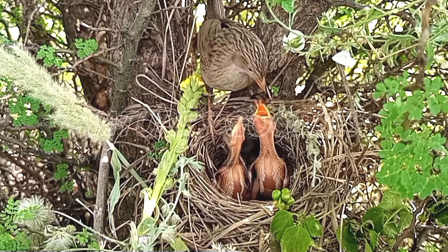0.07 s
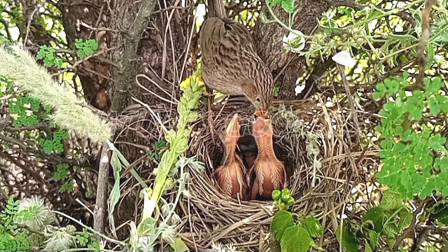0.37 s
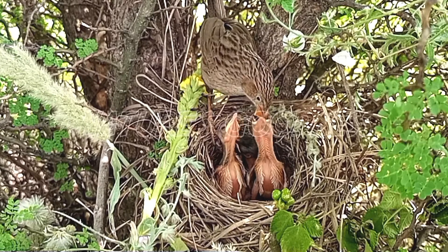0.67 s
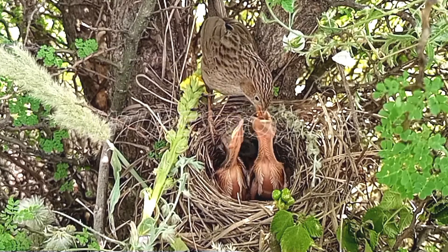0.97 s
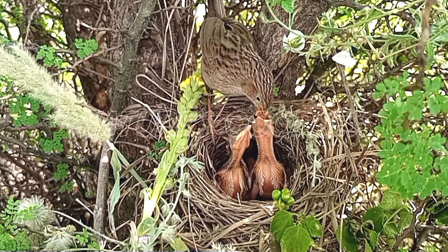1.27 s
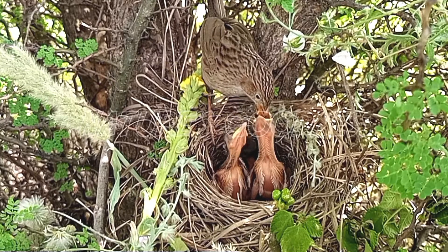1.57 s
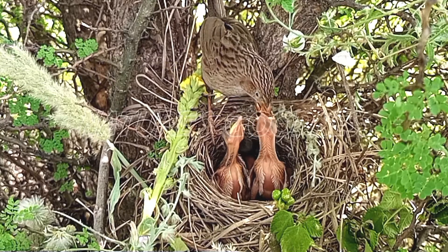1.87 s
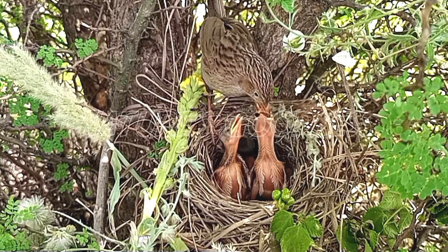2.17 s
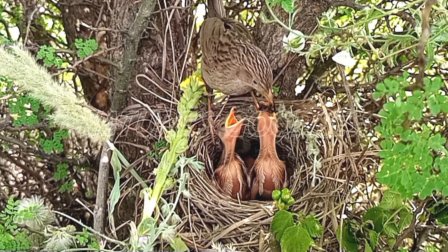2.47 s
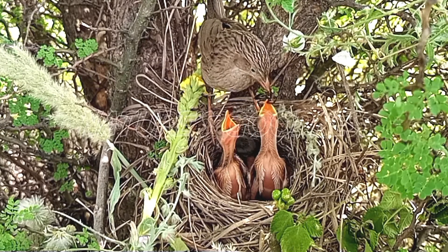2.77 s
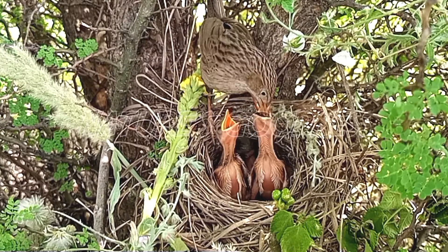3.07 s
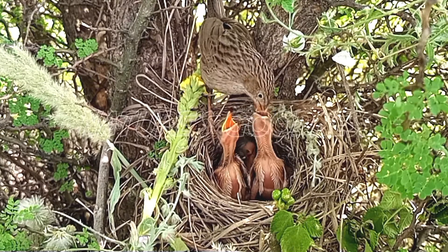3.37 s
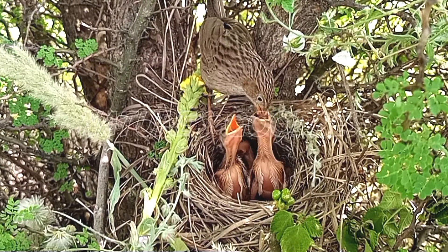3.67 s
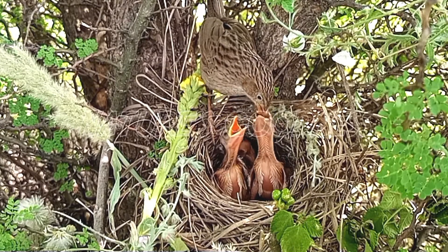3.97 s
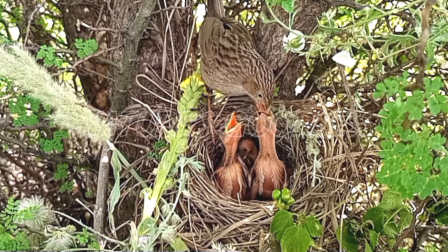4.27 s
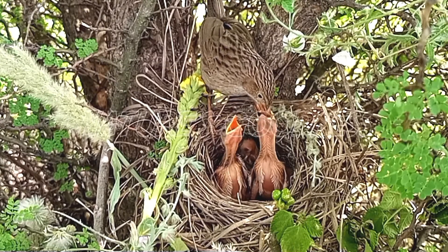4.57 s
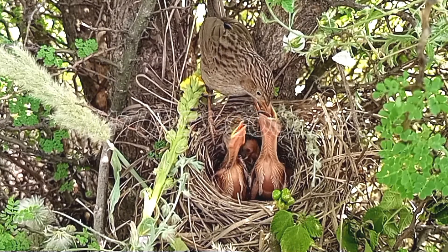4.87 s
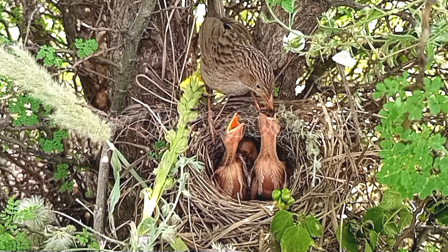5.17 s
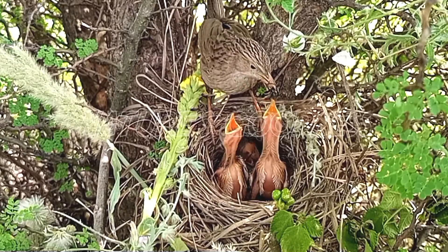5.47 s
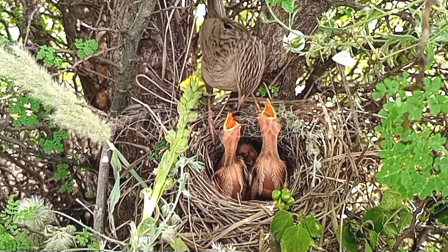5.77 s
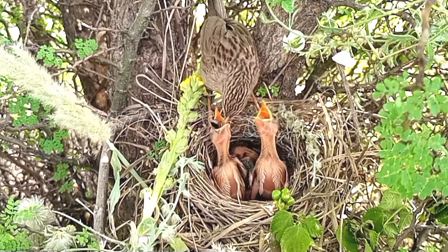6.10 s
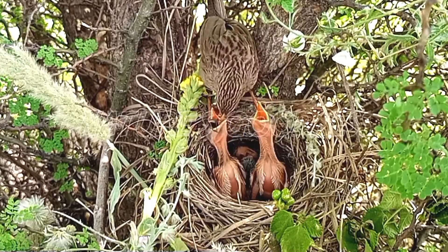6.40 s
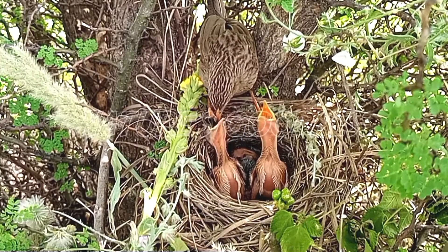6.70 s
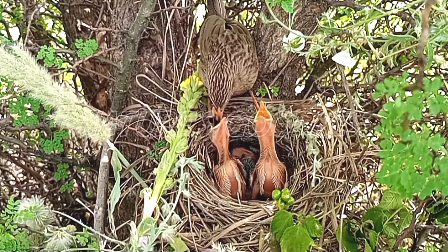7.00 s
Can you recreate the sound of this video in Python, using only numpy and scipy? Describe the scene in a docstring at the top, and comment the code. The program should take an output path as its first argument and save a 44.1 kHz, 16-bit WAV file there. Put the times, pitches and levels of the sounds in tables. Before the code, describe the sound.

Nestlings beg close by in a bush for the whole seven seconds. Their thin, very high squeals last about a tenth to a third of a second each and often carry two pitches at once, some held, some sliding down, some fluttering and raspy. Short, lower chirps and a few soft scratchy twitters fall between them. From about 1.1 to 2.5 seconds, five bird whistles cut in, roughly three a second, each rising quickly and falling more slowly; these are the loudest sounds. The squealing continues, with tiny beak or twig ticks at 4.6 and 5.2 seconds and faint peeps from 5.7 to 7. A distant bird trills faintly, about ten chips a second, during the first 0.7 seconds and again from 4.3 to the end. The foliage adds only slight, short reflections. A soft, even outdoor hiss and low rumble lie underneath throughout.

```python
"""Nestlings begging in a bush

Each side of the syrinx is an independent oscillator, so a squeal has two voices, which flutter and
rasp when forced. Five loud arched whistles cut in, among chirps, twitters, faint peeps and ticks of
beak and twigs. Twigs and ground scatter the calls; a far bird trills over hiss and a low rumble."""
import sys
import numpy as np
from scipy import signal
from scipy.fft import rfft, irfft
from scipy.io import wavfile
from scipy.ndimage import map_coordinates

SR = 44100
rng = np.random.default_rng(int(sys.argv[2]) if len(sys.argv) > 2 else 0)


def transcribe(signal):
    """Save signal, clipped to [-1, 1], as a 16-bit WAV file at the path in sys.argv[1]."""
    frames = np.atleast_2d(signal).T
    limited = np.clip(frames, -1, 1)
    pcm = np.round(limited * 32767).astype(np.int16)
    wavfile.write(sys.argv[1], SR, pcm)


N = 310464
T = np.arange(N) / SR

# Held squeals; "loudest" places the peak of the swell within a note: (start [s], end [s],
# upper voice: pitch [Hz], glide [Hz], scoop [Hz], flick [Hz], level [dB], loudest [0-1],
# lower voice: pitch [Hz], glide [Hz], bow [Hz], level [dB], loudest [0-1])
HELD_SQUEALS = [(0.0, 0.109, 6170, 356, -68, -70, -26.5, 0.67, 3930, -350, 64, -38, 0),
                (0.262, 0.38, 6310, 2132, 2260, -500, -25.5, 0.73, 3990, -1820, -340, -36, 0.96),
                (0.606, 0.768, 5355, 653, 1426, -1100, -34, 0.76, 4450, 500, 247, -42, 0.53),
                (0.99, 1.234, 5607, -300, 541, -140, -24.5, 0.2, 4680, 500, 197, -36.5, 0.53),
                (1.471, 1.679, 5540, -200, 420, -26, -25.5, 0.77, 4530, 600, -5, -36, 0.15),
                (1.949, 2.187, 5433, -440, 592, -10, -29, 0.26, 4450, 500, 200, -40, 0.7),
                (2.541, 2.753, 5720, -1040, 137, 600, -29, 0.1, 4550, 106, 450.5, -44, 0.63),
                (2.901, 3.134, 5780, -410, 1050, 1028, -26.5, 1, 4270, -90, 152, -40.5, 0.73),
                (3.867, 4.067, 5450, 260, 842, -420, -27, 0.12, 4440, 629, -150, -41, 0.76),
                (4.318, 4.513, 5625, -540, 404, 202, -24, 0.35, 4430, -100, 163, -40, 0.09),
                (4.747, 4.977, 5600, -190, 641, 6, -23.5, 0.66, 4550, 340, 483, -41, 0.95),
                (5.215, 5.413, 5630, -700, 364, 232, -28.5, 0.35, 4400, -250, 424.5, -38.5, 0.1),
                (5.724, 5.994, 5770, 547, 468, 960, -28, 0.81, 4194, -920, 850, -40.5, 0.5),
                (6.241, 6.431, 5886, 1016, 1727, -800, -26.5, 0.81, 3724, -1150, 202, -37.5, 0.73),
                (6.577, 6.759, 5700, -140, 658, 770, -24.5, 0.42, 5100, -1270, 600, -36, 0.72),
                (6.758, 6.987, 5620, -160, 660, 1300, -32, 0.88, 4150, -540, 502, -37.5, 1)]
# Squeals whose lower voice slides far down: (start [s], end [s], climb [s],
# then for the upper and the lower voice: crest [Hz], final pitch [Hz], level [dB], loudest [0-1])
FALLING_SQUEALS = [(0.389, 0.568, 0.054, 5850, 5300, -48, 0.65, 5130, 4470, -42, 0.66),
                   (0.851, 1, 0.024, 5090, 5600, -54, 0.94, 3920, 3190, -33.5, 0.26),
                   (2.616, 2.939, 0.033, 5820, 6430, -36, 0.45, 5000, 3580, -40.5, 0.39),
                   (3.206, 3.523, 0.025, 6700, 6380, -32, 0.56, 5670, 2905, -35, 0.37),
                   (3.819, 4.134, 0.04, 6120, 6150, -33, 0.9, 6060, 3800, -32, 0.73),
                   (4.414, 4.659, 0.03, 6360, 6190, -33.5, 0.62, 5690, 3780, -31.5, 0.57),
                   (5.052, 5.34, 0.081, 6130, 5660, -35, 0.9, 5390, 3817, -35.5, 0.42),
                   (5.59, 5.729, 0.034, 6820, 7130, -33.5, 0.62, 5200, 4050, -33.5, 0.52),
                   (6.013, 6.297, 0.019, 7300, 7200, -59, 0.3, 5580, 3253, -28, 0.88)]
# One-voiced chirps: (start [s], end [s], pitch [Hz], glide [Hz], bow [Hz], level [dB], loudest [0-1])
CHIRPS = [(0.0, 0.145, 4250, -440, -270, -43.5, 0.87), (0.199, 0.265, 2450, -130, 0, -37, 0.2),
          (0.351, 0.392, 3530, -300, 4, -28.5, 0.2), (0.356, 0.391, 2176, -700, 0, -20, 0.26),
          (0.897, 1.032, 4300, -70, 2, -39.5, 0.73), (1.418, 1.455, 5000, 440, 260, -47, 0.78),
          (1.669, 1.766, 4670, -1750, -29, -42, 0), (1.804, 1.842, 2570, -120, -50, -27, 0.15),
          (2.098, 2.194, 1660, 0, -120, -46.5, 0.56), (2.248, 2.335, 4450, -610, -400, -29.5, 0.42),
          (2.273, 2.321, 7070, 200, -180, -38, 0.58), (2.345, 2.387, 5630, -190, 160, -34, 0.67),
          (2.35, 2.389, 2820, -370, 40, -24.5, 0.12), (2.806, 2.95, 5770, 0, 2, -47, 0.8),
          (2.876, 2.945, 3290, -170, -40, -28.5, 0.1), (3.27, 3.402, 4370, -1620, -350, -37.5, 0.04),
          (3.317, 3.44, 6460, -120, -5, -20.5, 0.2), (3.385, 3.53, 3158, -260, 0, -25.5, 0.16),
          (3.431, 3.5, 1716, 20, 418, -37, 0.5), (3.514, 3.676, 2500, 800, 320, -30.5, 0.28),
          (3.621, 3.714, 3610, 93, 44, -40.5, 0.65), (3.731, 3.854, 2172, -660, -35, -35, 0.5),
          (3.746, 3.945, 4440, -46, -170, -45, 0.75), (3.825, 3.9, 5480, 650, 100, -48, 0.8),
          (4.295, 4.335, 6425, -250, 28, -34, 0.7), (4.857, 4.975, 4130, 70, 165, -46, 0.7),
          (5.719, 5.757, 2475, -320, -67, -29, 0.76), (5.936, 6.001, 3203, 645, -38, -25.5, 0.3),
          (5.975, 6.009, 1900, 650, -20, -30, 0.9), (6.029, 6.083, 6910, 1000, 160, -29.5, 0.76),
          (6.376, 6.43, 2860, -150, 3, -24.5, 0.35), (6.434, 6.453, 2030, 40, 100, -32, 0.6),
          (6.535, 6.592, 5740, -100, 463, -28.5, 0.2), (6.957, 7.045, 6010, -610, 288, -33, 0.62),
          (6.987, 7.005, 1966, -17, -20, -25.5, 0.5)]
# Forced stretches: (start [s], end [s], upper voice's swing [Hz], flutter rate [Hz], throb [dB])
FLUTTERS = [(0, 0.105, 80, 98.4, 0.5), (0.185, 0.316, 50, 112.7, 1.5), (.36, 0.406, 93, 137, 2.5),
            (1.796, 1.831, 163, 64.5, 0.5), (3.385, 3.534, 75, 194.3, 2), (3.53, 3.86, 39.7, 159, 2.5),
            (5.887, 6.02, 90, 125.6, 2.2), (6.36, 6.427, 89.5, 135, 1.8), (6.715, 6.75, 70, 138, 1),
            (6.89, 7.003, 65, 124.8, 1.5)]
# Wide gapes that let out the lower voice's octave: (start [s], end [s], octave gain [dB])
GAPES = [(0, .1, -11.5), (2.594, 2.746, -2.5), (2.96, 3.135, -9), (5.29, 5.413, -9.5), (5.73, 5.946, -4.5),
         (6.283, 6.36, -3.5), (6.61, 6.678, -1.5), (6.782, 6.961, -3)]
# Slight change in loudness of squeals and chirps with pitch: (pitch [Hz], gain [dB])
SQUEAL_COLOUR = [(2000, -0.15), (3000, -1.05), (3900, 1), (4600, 2.5), (5100, 2.5), (5700, 1.07),
                 (6500, 1.4), (7200, -0.9)]
# Whistles: (start [s], length [s], top pitch [Hz], last pitch [Hz], level [dB], effort change [dB])
WHISTLES = [(1.135, 0.19, 5520, 3330, -16.5, 5.5), (1.448, 0.19, 5380, 3323, -13, -5),
            (1.75, 0.18, 5220, 3290, -14.5, 0.5), (2.057, .19, 5350, 3264, -13, -3),
            (2.362, 0.17, 4853, 3295, -13.5, 2.5)]
# Their shared pitch contour: (share of length [0-1], height from last to top pitch [0-1])
WHISTLE_ARCH = [(0, .48), (.055, 0.048), (.135, .44), (.25, .87), (.31, 1), (.37, 1), (.43, .87),
                (.65, .54), (.85, 0.27), (1, 0.0064)]
# Resonances that the whistles sweep through: (frequency [Hz], gain [dB])
WHISTLE_RESONANCES = [(3300, -10.5), (3500, -8.5), (3850, -0.5), (4050, -4.5), (4250, 0.5), (4420, -3),
                      (4750, -10), (5200, -14.5), (5500, -9.5)]
# Soft twitters: (start [s], end [s], pitch [Hz], glide [Hz], bow [Hz], level [dB], loudest [0-1])
TWITTERS = [(0.187, 0.25, 3880, -500, -200, -39, 0.47), (0.239, 0.289, 3594, -1000, 457, -30, 0),
            (1.945, 1.983, 3410, -750, 0, -35.5, 0), (3.89, 3.944, 3470, -600, 0, -43, .5)]
# Ticks of beak and twigs: (time [s], level [dB], pitch [Hz])
TICKS = [(4.593, -25, 10640), (5.203, -36, 10700), (5.213, -37, 9900)]
# Bouts of the far trill: (start [s], end [s], chip spacing [s])
TRILL_BOUTS = [(.048, .72, .0885), (4.345, 4.72, .081), (4.785, 7.02, .1011)]
# Course of the trill: (time [s], top pitch [Hz], level [dB])
TRILL_COURSE = [(.05, 2830, -49), (.3, 2870, -63), (.57, 2670, -51.5), (.68, 2720, -61),
                (4.34, 3105, -53.5), (4.7, 2948, -45.5), (5.4, 3025, -54.5), (5.9, 3023, -49.5),
                (6.5, 2986, -48), (6.8, 2690, -45.5)]
# One chip: (time from onset [s], drop below top if slurred [Hz], drop if arched [Hz], level [dB])
CHIP_SHAPE = [(0, 5, 713, 2.5), (.009, 32, 258, -0.5), (0.021, 110, 3, 0.5), (.033, 157, 145, -4),
              (0.046, 230, 640, -2.5)]
# Change of the chips from slurs to arches: (time [s], arch [0-1])
CHIP_ARCHING = [(4.85, 0), (5.35, 1)]
# Spectrum of the outdoor background: (frequency [Hz], relative spectral level [dB])
AIR_SPECTRUM = [(25, -9), (50, -0.5), (98, 5.5), (346, -4), (494, -5.5), (627, -7), (1220, -11.5),
                (1750, -11.5), (2170, -13.5), (3030, -11.5), (4770, -14.5), (15000, -18.5)]

WAVER_HZ, SWAY_HZ, SWAY_DB = 32, 48, 1.2  # unsteady effort: quick and slow pitch drift, level drift
RASP_HZ = 75  # random pitch spread of the upper voice when fully forced
SCOOP_S, FLICK_S = .035, .025
LEAD_S, LEAD_DB = .018, -9.5  # a falling squeal creeps in early and softly
ONSET_SHARE, SLIDE_EASE = .89, 1.9  # first pitch as a share of the crest; slowing of the slide
CATCH_SPACING_HZ, CATCH_STRENGTH = 520, .55  # a sliding voice lingers on evenly spaced pitches
SWELL_DB, FADE_DB, EDGE_DB, EDGE_S = 10, 9, 7.5, 0.0062
WHISTLE_ATTACK_S, WHISTLE_ATTACK_DB = 0.026, -15
PEEP_COUNT, PEEP_SPAN_S, PEEP_RANGE_HZ = 11, (5.68, 6.92), (2900, 5300)
PEEP_S, PEEP_GLIDE_HZ, PEEP_BOW_HZ, PEEP_DB = 0.078, 600, 246, -51
AIR_DB, CUTOFF_HZ = -46.5, 15500


def nestlings():
    """Two oscillators on one air stream share their modulation and mix nonlinearly into a sum tone."""
    bend = WAVER_HZ * wander(75)
    throb_db = SWAY_DB * wander(45)
    bend += SWAY_HZ * wander(36)
    phase_drift = 1.3 * wander(50)  # the flutter is not quite regular
    rasp = RASP_HZ * wander(480)  # a forced membrane also slips at random
    for start, end, swing, rate, depth_db in FLUTTERS:
        forced = gate(start, end)
        cycle = np.sin(2 * np.pi * rate * (T - start) + phase_drift)
        bend += forced * (swing * cycle + min(depth_db / 2, 1) * rasp)
        throb_db += forced * depth_db * cycle
    upper, lower = squeal_notes()
    high, high_octave = voice(upper, jitter_hz=28.6, jitter_rate=240, shimmer_db=1.52, bend_hz=bend)
    low, low_octave = voice(lower, jitter_hz=26.7, jitter_rate=240, shimmer_db=2.5, bend_hz=.618 * bend)
    gape = undb(-27.5) + sum(gate(start, end, edge_s=0.0073) * undb(db) for start, end, db in GAPES)
    octaves = gape * band(low_octave, 5500, 9160) + undb(-38.5) * high_octave
    sum_tone = undb(15) * band(high * low, 6200, 8800)
    return (undb(0.5) * high + low + octaves + sum_tone) * undb(throb_db)


def squeal_notes():
    """Biphonation: each side of the syrinx has its own notes; chirps use the lower voice alone."""
    upper, lower = [], [bowed(*row) for row in CHIRPS]
    for start, end, *voices in HELD_SQUEALS:
        upper.append(held(start, end, *voices[:6]))
        lower.append(bowed(start, end, *voices[6:]))
    for start, end, climb, *voices in FALLING_SQUEALS:
        upper.append(falling(start, end, climb, *voices[:4]))
        lower.append(falling(start, end, climb, *voices[4:]))
    return upper, lower


def held(start, end, hz, glide, scoop, flick, db, loudest):
    """A linear glide between two pitch transients: a scoop at the onset and a flick at the release."""
    s, share = clock(start, end)
    onset = scoop * np.exp(-(s / SCOOP_S) ** 2)
    release = flick * np.exp((s - s[-1]) / FLICK_S)
    return sung(start, end, hz + glide * (share - .5) + onset + release, db, loudest)


def falling(start, end, climb, crest, final, db, loudest):
    """Exponential relaxation: the frequency climbs to a crest, then slows towards its final value."""
    s, _ = clock(start - LEAD_S, end)
    crest_s = LEAD_S + climb
    early = np.clip(1 - s / crest_s, 0, 1) ** 2
    past_crest = np.clip((s - crest_s) / (s[-1] - crest_s), 0, 1)
    slide = np.expm1(-SLIDE_EASE * past_crest) / np.expm1(-SLIDE_EASE)
    pitch = crest * (1 - (1 - ONSET_SHARE) * early) + (final - crest) * slide
    return sung(start - LEAD_S, end, pitch, db + LEAD_DB * early, loudest)


def bowed(start, end, hz, glide, bow, db, loudest):
    """A parabolic frequency sweep: a glide that bulges in the middle."""
    _, share = clock(start, end)
    pitch = hz + glide * (share - .5) - bow * (2 * share - 1) ** 2
    return sung(start, end, pitch, db, loudest)


def sung(start, end, hz, db, loudest):
    """Envelope: a note swells and fades as it slides in soft steps; loudness varies a little with pitch."""
    s, share = clock(start, end)
    catch_phase = 2 * np.pi * hz / CATCH_SPACING_HZ + rng.uniform(0, 2 * np.pi)
    pitch = hz - CATCH_STRENGTH * CATCH_SPACING_HZ / (2 * np.pi) * np.sin(catch_phase)
    swell = np.interp(share, [0, np.clip(loudest, .02, .98), 1], [-SWELL_DB, 0, -FADE_DB])
    edges = EDGE_DB * (np.exp(-s / EDGE_S) + np.exp((s - s[-1]) / EDGE_S))
    return np.column_stack([start + s, pitch, db + swell - edges + lookup(pitch, SQUEAL_COLOUR)])


def voice(notes, jitter_hz, jitter_rate, shimmer_db, bend_hz=0, edge_s=.0018):
    """A vibrating membrane's fundamental and octave; note rows are (time [s], pitch [Hz], level [dB])."""
    tone, octave = np.zeros((2, N))
    bend = np.broadcast_to(bend_hz, N)
    for rows in notes:
        s, hz, db = np.transpose(rows)
        span = np.arange(max(0, int((s[0] - edge_s) * SR)), min(N, int((s[-1] + edge_s) * SR)))
        t = T[span]
        pitch = np.interp(t, s, hz) + bend[span] + jitter_hz * wander(jitter_rate, len(t))
        level = np.interp(t, s, db) + shimmer_db * wander(110.2, len(t))
        ramp = np.clip(np.minimum(t - t[0], t[-1] - t) / (2 * edge_s), 0, 1)
        amplitude = np.sqrt(2) * np.sin(np.pi / 2 * ramp) ** 2 * undb(level)
        phase = 2 * np.pi * np.cumsum(pitch) / SR
        tone[span] += amplitude * np.sin(phase)
        octave[span] += amplitude * np.sin(2 * phase)
    return tone, octave


def whistles():
    """Resonance: a nearly pure tone dips, rises quickly and falls slowly, loudest near 4 kHz."""
    notes = []
    for start, length, top, last, db, change_db in WHISTLES:
        s, share = clock(start, start + length)
        hz = last + (top - last) * lookup(share, WHISTLE_ARCH)
        attack = WHISTLE_ATTACK_DB * np.clip(1 - s / WHISTLE_ATTACK_S, 0, 1)
        level = db + attack + change_db * (share - .5) + lookup(hz, WHISTLE_RESONANCES)
        notes.append(np.column_stack([start + s, hz, level]))
    tone, octave = voice(notes, jitter_hz=30.8, jitter_rate=300, shimmer_db=2.0)
    return tone + undb(-22.5) * band(octave, 9810, 10470)


def twitters():
    """Strong random modulation of frequency and amplitude makes quiet slurs scratchy."""
    return voice([bowed(*row) for row in TWITTERS], jitter_hz=179, jitter_rate=410, shimmer_db=6.5)[0]


def peeps():
    """Faint arched frequency sweeps from deep in the nest, random in time, pitch and slope."""
    notes = []
    for when, height, slope in rng.uniform(size=(PEEP_COUNT, 3)):
        start = np.interp(when, [0, 1], PEEP_SPAN_S)
        hz = np.interp(height, [0, 1], PEEP_RANGE_HZ)
        glide = PEEP_GLIDE_HZ * (2 * slope - 1)
        notes.append(bowed(start, start + PEEP_S, hz, glide, PEEP_BOW_HZ, PEEP_DB, loudest=.5))
    return voice(notes, jitter_hz=49.6, jitter_rate=240, shimmer_db=3.5)[0]


def ticks(decay_s=0.0036):
    """Damped transients of beak and twigs: noise bursts, each strongest near its own pitch."""
    out = np.zeros(N)
    for start, db, hz in TICKS:
        envelope = undb(db) * (T >= start) * np.exp(-np.abs(T - start) / decay_s)
        snap = envelope * rng.standard_normal(N)
        out += undb(12) * band(snap, 0.92 * hz, 1.024 * hz) + undb(-6) * band(snap, 4000, 16000)
    return out


def far_trill():
    """A periodic train of sweeps: about ten chips a second, changing from falling slurs to arches."""
    times, pitches, levels = np.transpose(TRILL_COURSE)
    offset, slur_drop, arch_drop, chip_db = np.transpose(CHIP_SHAPE)
    notes = []
    for start in np.concatenate([np.arange(*bout) for bout in TRILL_BOUTS]):
        arch = lookup(start, CHIP_ARCHING)
        hz = np.interp(start, times, pitches) - (1 - arch) * slur_drop - arch * arch_drop
        db = np.interp(start, times, levels) + chip_db
        notes.append(np.column_stack([start + offset, hz, db]))
    return voice(notes, jitter_hz=40, jitter_rate=275, shimmer_db=5.0)[0]


def foliage(x, near_db, near_t60, far_db, far_t60):
    """Scattering: dense early echoes from twigs and ground, then a faint tail from the bushes around."""
    t = T[:SR // 2]
    onset = np.clip(t / 0.005 - 1, 0, 1)  # the first echoes arrive after 5 ms
    response = 0
    for db, t60 in ((near_db, near_t60), (far_db, far_t60)):
        tail = rng.standard_normal(len(t)) * np.exp(-np.log(1000) * t / t60) * onset
        response += undb(db) * tail / np.linalg.norm(tail)
    return signal.fftconvolve(x, response)[:N]


def air():
    """Spectrally shaped noise: an even hiss over a low rumble with random amplitude modulation."""
    hz, db = np.transpose(AIR_SPECTRUM)
    f = np.maximum(np.arange(N // 2 + 1) * SR / N, 1)
    shape = undb(np.interp(np.log(f), np.log(hz), db))
    noise = irfft(rfft(rng.standard_normal(N)) * shape, N)
    noise *= undb(AIR_DB) / np.std(noise)
    rumble = irfft(rfft(noise) / (1 + (f / 400) ** 2), N)
    lumps_db = 2.2 * wander(26)
    return noise + (undb(lumps_db) - 1) * rumble


def undb(db):
    """Amplitude ratio of a level in decibels."""
    return 10 ** (np.asarray(db) / 20)


def lookup(x, table):
    """Linear interpolation in a two-column table."""
    return np.interp(x, *np.transpose(table))


def clock(start, end):
    """Time since a note's onset [s] and the share of it elapsed [0-1]."""
    share = np.linspace(0, 1, 128)
    return share * (end - start), share


def wander(rate, size=N):
    """Smooth random fluctuation with a spread near 1, changing rate times a second."""
    place = np.arange(size) * rate / SR
    return map_coordinates(rng.standard_normal(4096), [place], order=3, mode="wrap")


def gate(start, end, edge_s=0.0015):
    """Trapezoidal window between two times."""
    return np.clip(np.minimum(T - start, end - T) / edge_s + .5, 0, 1)


def band(x, lo_hz, hi_hz):
    """Band-pass filter with gentle slopes."""
    return signal.sosfilt(signal.butter(2, [lo_hz, hi_hz], "band", fs=SR, output="sos"), x)


def scene():
    """Superposition of nest, whistles and far trill, each with its own scattering, and the background."""
    nest = nestlings() + peeps() + ticks()
    calls = whistles() + twitters()
    trill = far_trill()
    nest += foliage(nest, near_db=-19, near_t60=.05, far_db=-28, far_t60=.4)
    calls += foliage(calls, near_db=-13.5, near_t60=.035, far_db=-22.5, far_t60=.4)
    trill += foliage(trill, near_db=-9, near_t60=.06, far_db=-42, far_t60=.5)
    return (nest + calls + trill + air())[None]


def record(dry):
    """Band limiting: a steep low-pass filter removes the highest treble."""
    return signal.sosfilt(signal.ellip(10, .1, 80, CUTOFF_HZ, fs=SR, output="sos"), dry)


dry = scene()
out = record(dry)
transcribe(out)
```